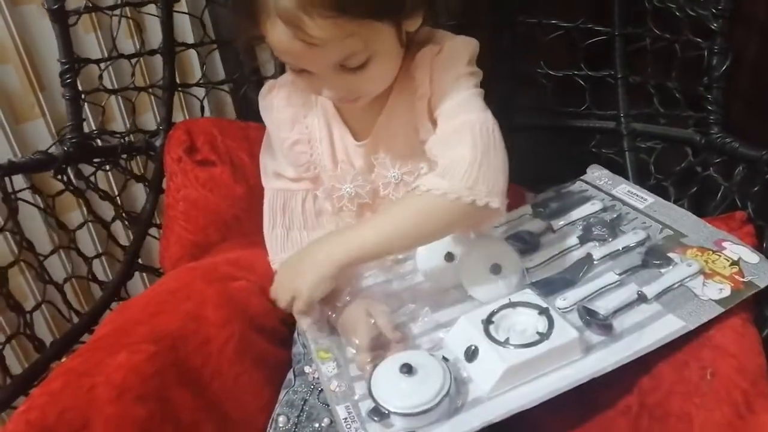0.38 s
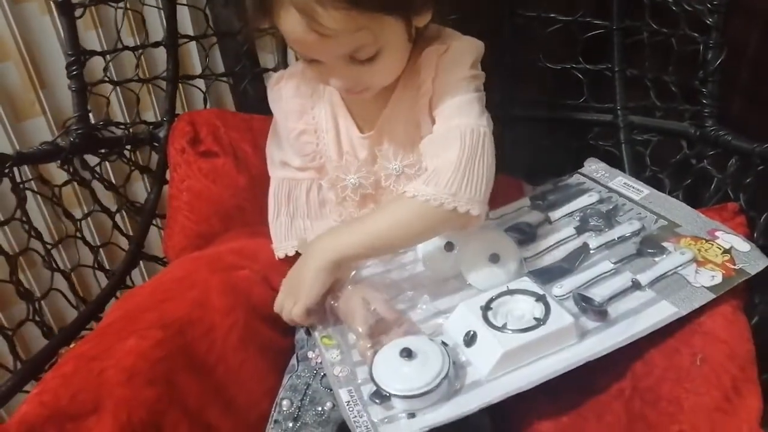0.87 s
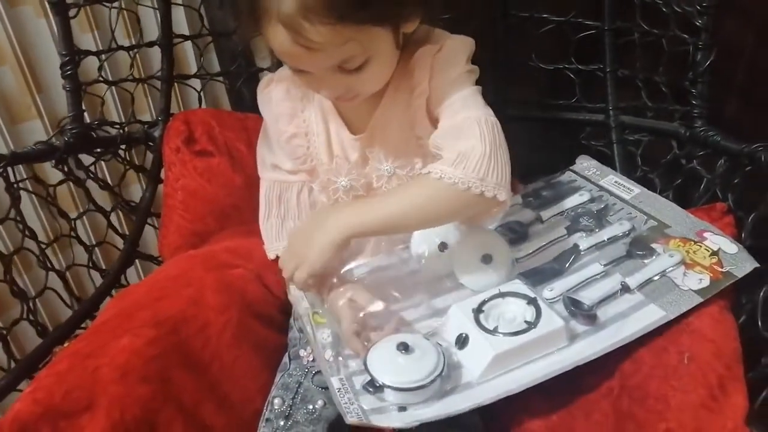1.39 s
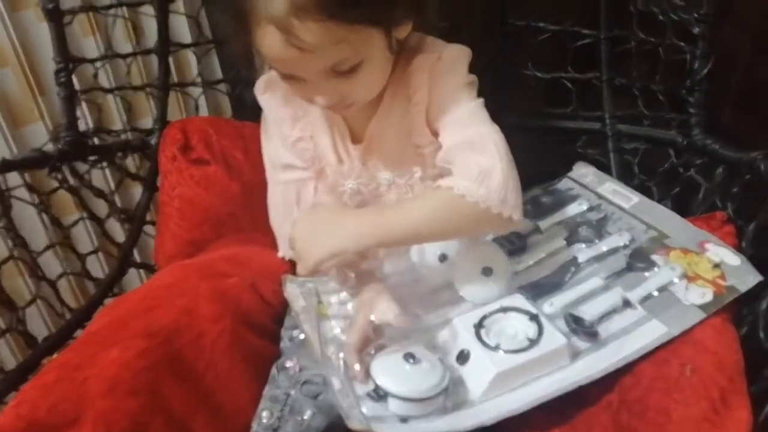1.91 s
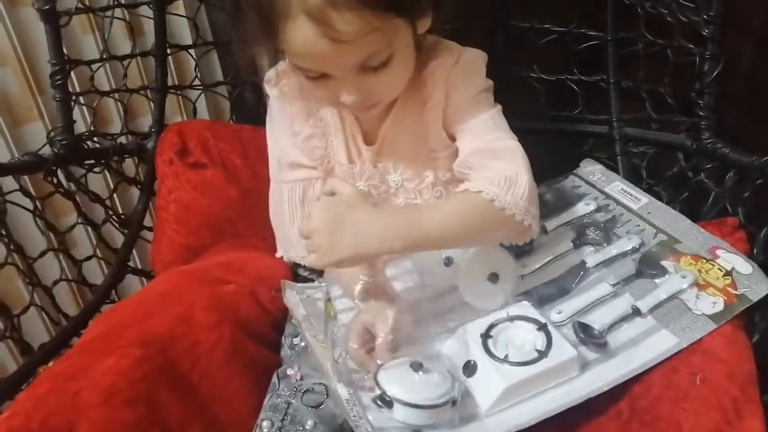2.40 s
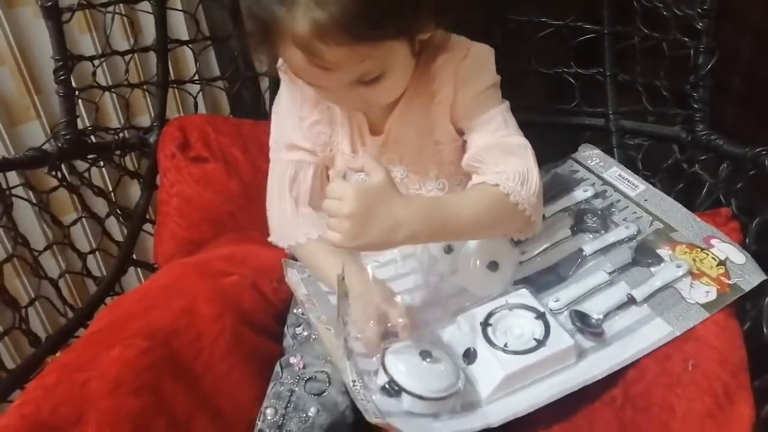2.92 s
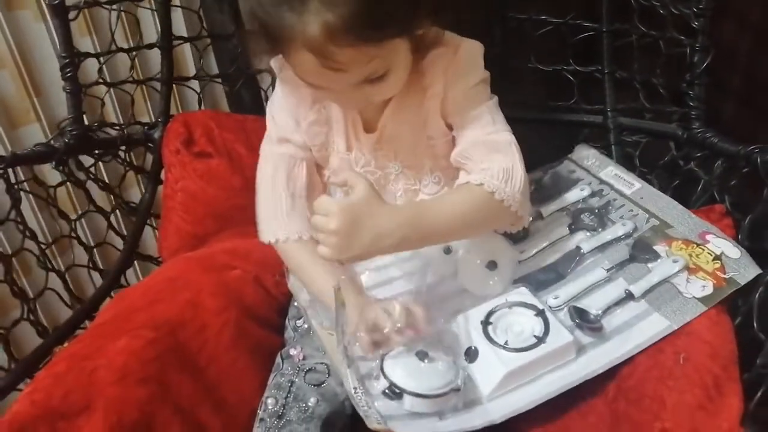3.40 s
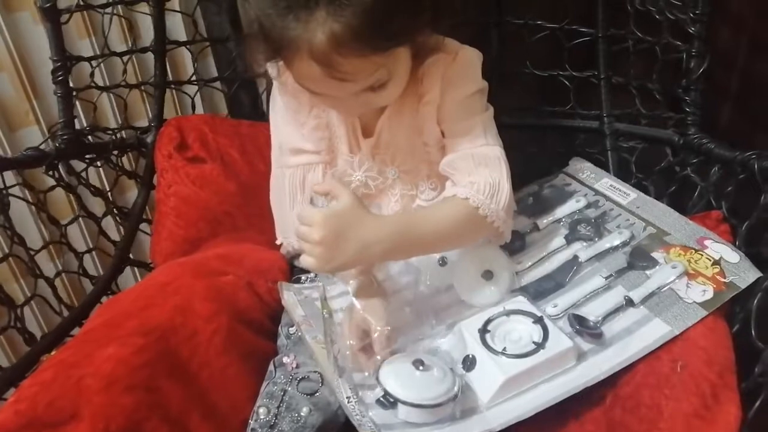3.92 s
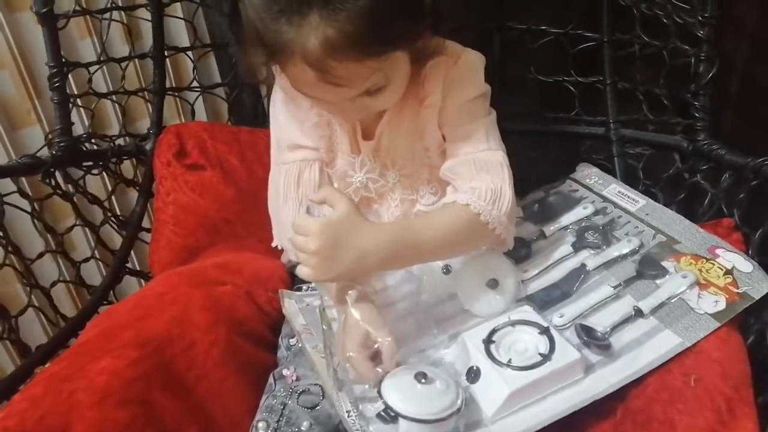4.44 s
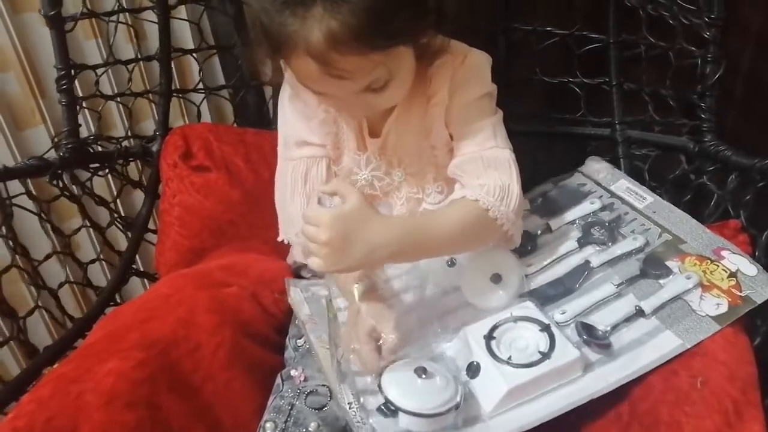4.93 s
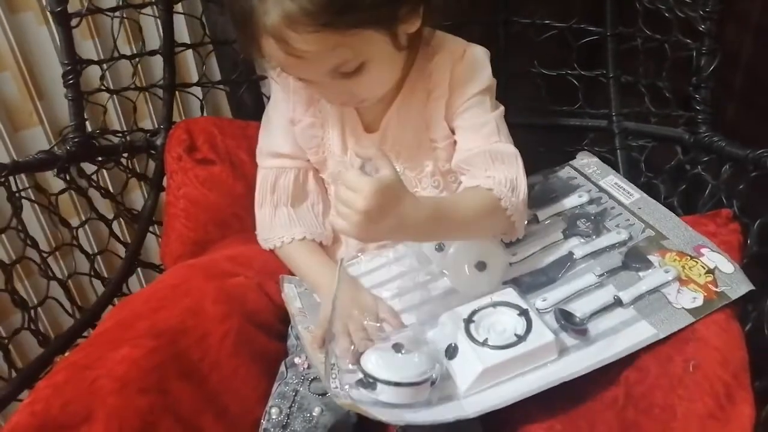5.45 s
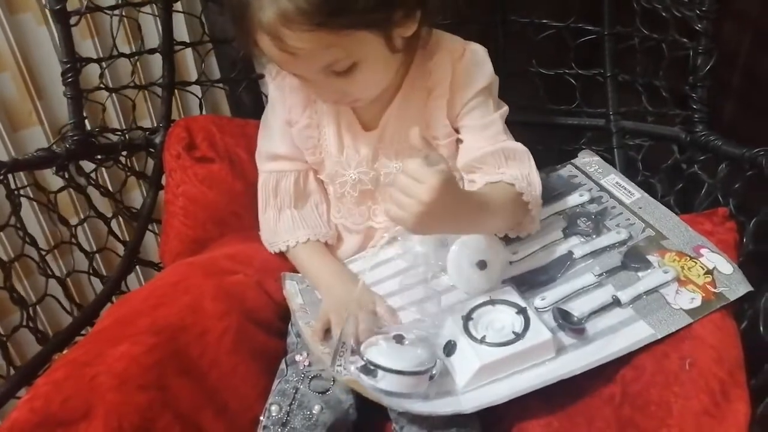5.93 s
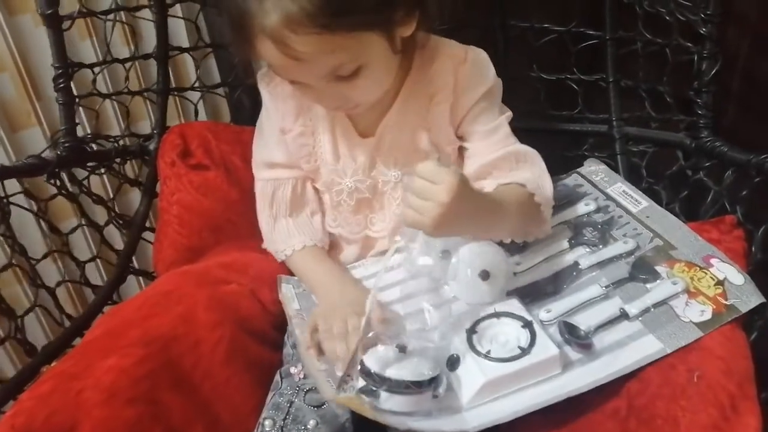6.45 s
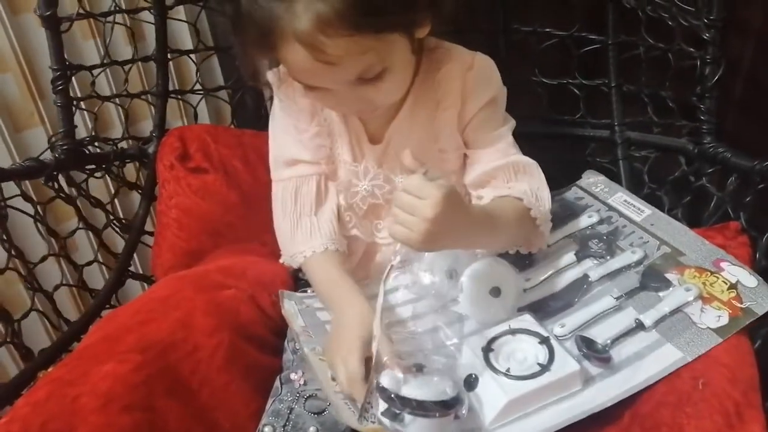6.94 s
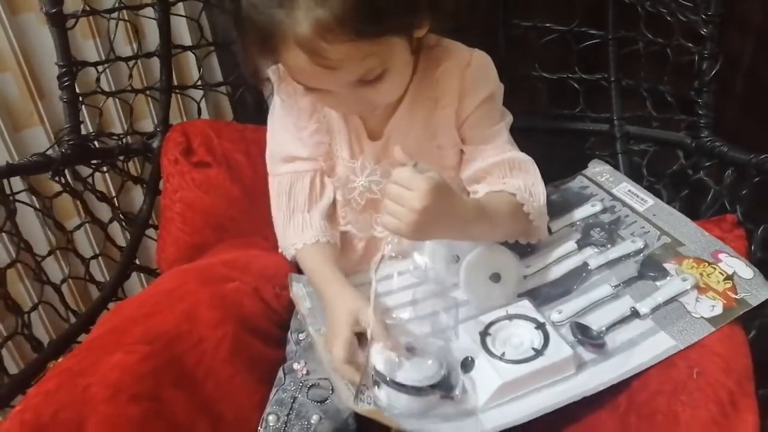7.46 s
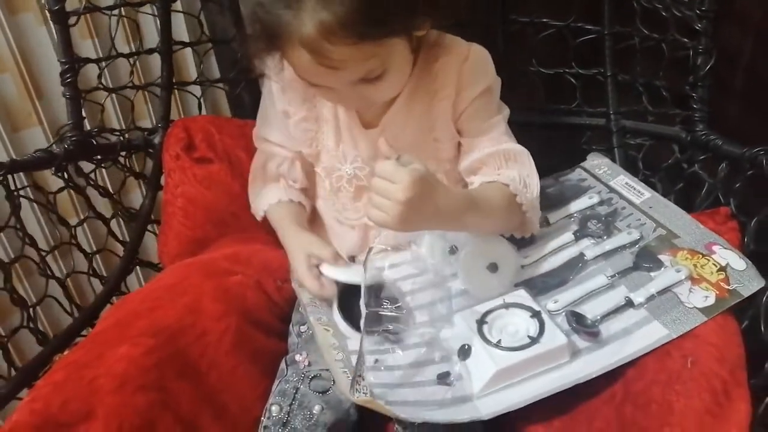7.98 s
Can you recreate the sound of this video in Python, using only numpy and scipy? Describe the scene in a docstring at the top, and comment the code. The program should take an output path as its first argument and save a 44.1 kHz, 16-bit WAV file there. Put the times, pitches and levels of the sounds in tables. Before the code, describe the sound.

A child's hands bend a stiff plastic blister sheet on a card. Sharp irregular snaps and fine crackle come in dense bursts for three seconds, thin to a near lull past four, then return until about seven before lightening. Small toys knock and scuff dully on the card. A tiny squeak comes near the end. Close stereo microphone, small furnished room, faint hiss and low hum.

```python
"""Hands bend a stiff clear plastic blister sheet on its card and work toy pieces out of it.
Buckles snap thickly until about 3 s, thin out to a near lull at 4 to 4.8 s, snap again up to 7 s,
then lightly to 8 s, with a short squeak at 7.85 s. Each snap: noise crack, ringing pocket, push on the card.
Knocks and scuffs excite card modes; grains make fine crackle. A small furnished room answers by echoes
and noise tails. Sine hum and noise hiss run throughout; two microphone ports, gain control."""
import sys
import numpy as np
from scipy import signal
from scipy.io import wavfile
from scipy.ndimage import uniform_filter1d

SR = 44100
rng = np.random.default_rng(int(sys.argv[2]) if len(sys.argv) > 2 else 0)


def generate_wav(sig):
    """Save sig (samples, or channels by samples) to the path in sys.argv[1] as 16-bit PCM at SR."""
    pcm = np.round(np.clip(np.atleast_2d(sig).T, -1, 1) * 32767).astype(np.int16)
    wavfile.write(sys.argv[1], SR, pcm)


def convert_level_to_amplitude(level_db):
    """Map a level in decibels to its linear amplitude factor."""
    exponent = np.asarray(level_db, float) / 20
    return 10 ** exponent


N = 356769  # samples

# Levels of sources are before trims, room, ports and gain control.
# loud buckles: t/s, crack level/dB, top octave level/dB, pocket level/dB, pocket f/Hz
SNAPS = [(0.0129, -51, -68, -59, 980), (0.0924, -42.5, -56, -56.5, 2900), (0.2239, -50, -78, -60, 780),
         (0.2634, -66, -79, -57, 1640), (0.2868, -39, -55, -50.5, 754), (0.378, -40, -53, -51, 1530),
         (0.3884, -42, -51, -45, 945), (0.4139, -36.5, -55, -48, 2920), (0.4651, -24, -36.5, -36, 2730),
         (0.4838, -31, -43, -44, 1410), (0.4968, -26.5, -52, -33, 1520), (0.5352, -30.5, -47, -37, 696),
         (0.5666, -19.5, -41.5, -34, 2220), (0.6963, -41, -60, -61, 764), (0.7637, -37.5, -67, -43.5, 1530),
         (0.8097, -41.5, -65, -55.5, 1020), (0.8369, -42.5, -65, -46, 1600), (1.076, -57, -65, -52.5, 890),
         (1.1178, -39.5, -58, -68, 3340), (1.14, -46, -62, -50.5, 970), (1.1689, -32.5, -51, -40, 3190),
         (1.1822, -34, -66, -34, 1670), (1.2149, -32, -49, -43.5, 780), (1.262, -44, -65, -52, 2870),
         (1.2779, -46, -57, -43, 1630), (1.3095, -35, -53, -44, 2820), (1.3708, -29.5, -39, -43, 2700),
         (1.3872, -26.5, -63, -42, 710), (1.4156, -35, -61, -43, 1280), (1.4345, -20.5, -40, -29.5, 2140),
         (1.49, -29.5, -64, -37.5, 2680), (1.5669, -40, -51, -51, 910), (1.581, -27.5, -53, -32.5, 940),
         (1.6197, -31, -49.5, -45, 2870), (1.6763, -32, -56, -38, 3250), (1.6866, -20.5, -47, -37.5, 1530),
         (1.708, -31, -53, -40, 3580), (1.7174, -23, -44.5, -36.5, 3540), (1.729, -23, -60, -34, 1630),
         (1.7795, -44, -69, -42, 2100), (1.8235, -23.5, -53, -41, 3400), (1.8647, -31, -60, -35.5, 1510),
         (1.9043, -35, -48, -45, 1620), (1.9334, -22.5, -43.5, -29, 1680), (1.9463, -27, -53, -38.5, 1370),
         (2.0533, -30.5, -72, -37.5, 3380), (2.096, -38, -68, -44, 1370), (2.1127, -21.5, -43, -36, 3500),
         (2.135, -38, -65, -42, 2970), (2.154, -25, -48, -41, 2200), (2.2191, -19.5, -42, -31.5, 2940),
         (2.265, -24.5, -42.5, -36.5, 1530), (2.364, -33, -52, -41.5, 2810), (2.382, -32, -47, -44.5, 2830),
         (2.443, -30, -43, -43.5, 1410), (2.5127, -37.5, -57, -46, 1500), (2.5399, -22, -41, -35.5, 820),
         (2.5814, -23, -45.5, -34.5, 910), (2.705, -38, -61, -51, 1500), (2.7452, -29.5, -55, -40.5, 900),
         (2.7673, -24, -43, -43, 2920), (2.811, -27.5, -47, -43.5, 1150), (2.8692, -27, -45.5, -38.5, 2910),
         (2.9474, -34.5, -53.5, -48, 3040), (2.9846, -32.5, -63, -40.5, 1340),
         (3.0864, -53, -72, -51.5, 910), (3.194, -39.5, -69, -57.5, 764), (3.2237, -46, -67, -58.5, 870),
         (3.2624, -30.5, -52, -44, 3760), (3.3209, -38.5, -59.5, -40, 1290),
         (3.3319, -29.5, -55, -40, 1070), (3.4351, -45.5, -84, -45.5, 883), (3.5389, -54, -78, -45, 759),
         (3.5566, -44, -71, -43, 1490), (3.5683, -40.5, -63, -38.5, 860), (3.6881, -71, -84, -50.5, 880),
         (3.7923, -47.5, -61.5, -47, 880), (3.905, -52, -73, -52, 910), (3.947, -47, -62, -62, 1490),
         (3.959, -44, -60, -60, 850), (4.0528, -55.5, -73, -48.5, 940), (4.5711, -51.5, -59, -91, 825),
         (4.8189, -35, -66, -57.5, 3250), (4.9686, -57.5, -77, -53.5, 1040),
         (5.1231, -36.5, -68, -42.5, 3190), (5.1552, -54, -82, -48, 1250), (5.2362, -61, -72, -66, 1350),
         (5.4568, -40.5, -57, -34.5, 1550), (5.4889, -45, -62, -47, 870), (5.6382, -32.5, -53, -44, 3010),
         (5.699, -27, -45, -34.5, 760), (5.7627, -31.5, -48.5, -41.5, 3120), (5.785, -35, -66, -38, 890),
         (5.8686, -33, -57, -42.5, 2430), (5.9406, -33, -52, -51, 3140), (5.9642, -56, -68, -45, 1490),
         (6.0437, -32, -50.5, -40.5, 2200), (6.0655, -34, -49, -41, 1530), (6.0901, -35, -53, -42, 930),
         (6.135, -29.5, -52, -49, 3020), (6.1456, -22, -41, -34.5, 3570), (6.2131, -27.5, -42.5, -42, 1200),
         (6.2321, -31, -49, -49, 1250), (6.2508, -31, -60, -44, 850), (6.3134, -50, -71, -56, 920),
         (6.4203, -23, -42, -42, 1280), (6.5775, -33.5, -62, -45.5, 2960),
         (6.633, -41.5, -81.5, -45.5, 1440), (6.7391, -56, -88, -49, 1660), (6.763, -52.5, -84, -62, 2240),
         (6.8402, -20.5, -38, -37, 1090), (6.8977, -29, -52, -45, 1930), (6.9773, -41.5, -62, -43, 1560),
         (7.217, -49.5, -76, -53.5, 2890), (7.2454, -48, -67.5, -74, 3420), (7.297, -54, -75, -62, 940),
         (7.532, -30, -52, -53, 3640), (7.5587, -46, -60, -48, 990), (7.6123, -37.5, -56, -56, 2860),
         (7.671, -35, -58, -44, 3320), (7.6805, -40, -64, -53, 1190), (7.6946, -36, -60, -61, 3480),
         (7.7085, -36, -57, -54, 3470), (7.7198, -33, -51, -44.5, 970), (7.9534, -55, -73, -52, 1220),
         (8.0057, -41, -66, -50.5, 2690)]
# crack colour: f/Hz, level/dB
CRACK_COLOUR = [(1500, -22.5), (3000, -7.5), (4200, -0.5), (6500, 2), (8500, -2.5), (10000, -37.5),
                (16000, -51)]
# top octave of the crack: f/Hz, level/dB
TOP_COLOUR = [(5000, -33.5), (8000, -5), (9000, 1.5), (15000, -2), (17000, -12)]
# broad part of the pocket knock: f/Hz, level/dB
POCKET_COLOUR = [(300, -30), (700, 0.5), (1200, 3), (3000, -0.5), (4200, -5.5), (8000, -48)]
# modes of the card and the toys on it: f/Hz, relative level/dB, t60/s
CARD_MODES = [(190, -36, .05), (301.6, -4.5, 0.072), (355.4, 1.5, 0.071), (410, -9.5, 0.12),
              (468.4, -10, 0.07), (651.7, -4.5, 0.041), (758, -2.5, 0.033), (885, -1, 0.034),
              (889, -4.5, 0.0087)]
# toys and fingers knock the card: t/s, low modes level/dB, upper modes level/dB
KNOCKS = [(0.229, -48, -56), (0.283, -52.5, -56), (0.387, -68, -50), (0.465, -41.5, -43.5),
          (0.505, -37.5, -47), (0.533, -35.5, -47), (1.076, -55, -68), (1.168, -49, -50),
          (1.364, -49, -48.5), (1.386, -40, -46), (1.491, -42, -49), (1.557, -44, -60), (1.581, -38, -44),
          (1.656, -54, -39.5), (1.778, -46, -46), (1.932, -50, -43.5), (2.056, -50, -54),
          (2.22, -48.5, -65), (2.263, -41.5, -50), (2.538, -42, -45), (2.585, -38, -37.5),
          (2.703, -44, -51), (2.946, -48.5, -49), (2.98, -51, -44.5), (3.086, -45.5, -45.5),
          (3.321, -41, -44), (3.435, -56, -45), (3.533, -46, -51), (3.568, -43, -45), (3.594, -41, -48),
          (3.686, -57, -46), (3.792, -52, -48), (3.906, -55, -51), (3.958, -51, -63), (4.05, -42, -42),
          (4.412, -65, -60.5), (4.97, -47.5, -47), (5.157, -50, -53), (5.432, -42, -37.5),
          (5.487, -51, -41.5), (5.698, -68, -41.5), (5.781, -45.5, -42.5), (6.035, -62, -52),
          (6.09, -42, -36), (6.141, -50, -47), (6.419, -54.5, -59), (6.631, -58, -49.5), (6.977, -67, -49),
          (7.036, -48.5, -66), (7.065, -64, -58), (7.721, -44, -50)]
# slow activity of the hands: t/s, fine crackle level/dB, card scuffing level/dB
HANDLING = [(0.0, -64, -68.5), (0.63, -46.5, -59), (0.88, -72, -71), (1.13, -57, -71), (1.3, -49, -62.5),
            (1.6, -53, -64), (2.37, -58, -86), (2.77, -53, -63), (3.09, -69, -65.5), (3.49, -59, -64),
            (4.28, -82.5, -76.5), (4.57, -78.5, -86.5), (5.86, -61, -76.5), (6.13, -76, -58.5),
            (6.26, -60, -72), (7.44, -69, -70.5), (7.73, -49, -65.5), (8.09, -64.5, -62.5)]
# longer swells of crumpling: peak t/s, fine crackle level/dB, card scuffing level/dB, rise/s, fall/s
CRUMPLES = [(.39, -50, -67, 0.027, 0.025), (.53, -50.5, -51, 0.056, 0.033), (1.4, -53, -59, 0.038, .08),
            (1.6, -58, -65, .03, 0.098), (2.58, -39, -56, 0.016, 0.084), (3.598, -61, -54.5, 0.035, 0.06),
            (5.051, -61.5, -62.5, 0.055, 0.064), (5.2, -64, -72, 0.034, 0.1),
            (5.449, -38.5, -47, 0.071, 0.05), (6.14, -40, -58, 0.083, .08), (7.7, -66, -59, 0.035, 0.02),
            (7.88, -57, -76, 0.028, 0.11)]
# fine crackle colour: f/Hz, level/dB
CRACKLE_COLOUR = [(300, -41.5), (700, -14), (1500, -1), (3000, -5), (6000, -4.5), (9000, -4.5),
                  (15000, -23)]
# toy edge squeaks along the plastic: peak t/s, level/dB, rise/(dB/s), fall/(dB/s)
SQUEAKS = [(7.853, -57., 500., 650.)]
# two squeak tones: f/Hz before the glide, f/Hz after it
SQUEAK_TONES = [(1550., 2400), (2850., 3300.)]
# near walls: t/s, level/dB
ECHOES = [(0.0128, -19), (0.0232, -21)]
# room decay: f/Hz, t60/s
ROOM_T60 = [(200, 0.19), (600, 0.29), (1500, 0.31), (4000, 0.45), (9000, 0.39), (15000, 0.3)]
# room tail colour: f/Hz, relative level/dB
ROOM_COLOUR = [(200, 10.5), (700, 0), (2000, 2), (5000, -5), (9000, -1.5), (15000, 6)]
# diffuse sound: f/Hz, left-right likeness (0 to 1)
LIKENESS = [(60, 0.52), (300, 1), (700, 0.43), (1300, 0.34), (2500, 0.12), (15000, 0.01)]
# hum level: t/s, level/dB
HUM_LEVEL = [(0, -67), (.4, -57.5), (1.1, -61), (2., -63), (3.2, -63.5), (4.4, -70), (5.2, -62), (6.2, -71),
             (6.75, -60), (7.3, -66), (8.09, -68)]
# hiss colour: f/Hz, relative density/(dB per Hz)
HISS_COLOUR = [(25, -4), (60, -5), (100, -7), (300, -17), (600, -23), (1500, -31.5), (3000, -35),
               (6000, -41), (10000, -35), (16000, -31)]
# microphone port colour: f/Hz, left level/dB, right level/dB
PORTS = [(30, 0, -4.5), (760, 5.5, 2.5), (1500, 3.5, 4), (2200, 3, 4), (3180, 7, 8.5), (4080, -0.5, 3.5),
         (4530, 3.5, 4.5), (5210, 3, 11), (6660, 2.5, 11), (8700, 4, -4.5), (9600, -0.5, -4.5),
         (11600, -8, -6), (13900, -12, -13), (14600, -4, -1), (15400, -19, -43.5)]


def snaps(crack_db=-2.0, top_db=16.5, pocket_db=2.56, card_db=-17.5, broad=1.3):
    """Each buckle: a two-band crack, a briefly ringing pocket and a light push on the card."""
    s, crack, top, pocket, hz = np.transpose(SNAPS)[:, :, None]
    count, t = len(SNAPS), np.arange(1024) / SR
    t60_s = 0.0079 + 0.005 * rng.random((count, 1))
    sign = np.sign(rng.random(count) - 0.5)

    sound = convert_level_to_amplitude(crack + crack_db) * cracks(count, CRACK_COLOUR, t60_s)
    sound += convert_level_to_amplitude(top + top_db) * cracks(count, TOP_COLOUR, 0.6 * t60_s)
    ring = peaked(np.sin(2 * np.pi * hz * t) * convert_level_to_amplitude(-60 * t / 0.011) * np.minimum(t / 0.001, 1))
    knock = ring + broad * cracks(count, POCKET_COLOUR, 3.3 * t60_s)
    sound += convert_level_to_amplitude(pocket + pocket_db) * peaked(knock)

    out, push = np.zeros((2, N + 2048)), np.zeros(N + 2048)
    at = np.round(s * SR).astype(int)
    for side in (0, 1):
        np.add.at(out[side], at + np.arange(1024), sound[side])
    np.add.at(push, at[:, 0], convert_level_to_amplitude(pocket + card_db)[:, 0] * sign)
    return out[:, :N] + signal.oaconvolve(push, card_ring())[:N]


def cracks(count, colour, t60_s, shiver_db=-11.0, shiver_t60_s=0.042, same=0.49):
    """Bursts of quick slips, then the sheet shivers out; each port sees its own side of the sheet."""
    t = np.arange(1024) / SR
    fall = convert_level_to_amplitude(-60 * t / t60_s) + convert_level_to_amplitude(shiver_db - 60 * t / shiver_t60_s)
    fall = fall * np.minimum(t / 0.00044, 1)
    both, left, right = np.moveaxis(rng.standard_normal((count, 3, 1024)), 1, 0)
    slips = (np.sqrt(same) * both + np.sqrt(1 - same) * np.array([left, right])) * fall
    return peaked(signal.fftconvolve(slips, causal(colour)[None, None], axes=2)[:, :, :1024])


def card_ring(modes=CARD_MODES):
    """The card and the toys on it as dying modes; a free card radiates no deep bass."""
    t = np.arange(6000) / SR
    ring = sum(convert_level_to_amplitude(db - 60 * t / t60_s) * np.sin(2 * np.pi * hz * t) for hz, db, t60_s in modes)
    return peaked(signal.sosfilt(signal.butter(2, 200, "high", fs=SR, output="sos"), ring))


def knocks(low_db=-2.0, upper_db=1.0, touch_s=0.00082):
    """Each knock is a soft push on the card, with separate levels for low and upper modes."""
    s, low, upper = np.transpose(KNOCKS)
    at = np.round(s * SR).astype(int)
    sign = rng.choice([-1.0, 1.0], len(s))
    touch = np.hanning(int(touch_s * SR) + 3)
    out = np.zeros(N)
    for db, modes in ((low + low_db, CARD_MODES[:5]), (upper + upper_db, CARD_MODES[5:])):
        push = np.zeros(N)
        np.add.at(push, at, convert_level_to_amplitude(db) * sign)
        out += signal.oaconvolve(push, peaked(np.convolve(card_ring(modes), touch)))[:N]
    return out


def crackle(level_db=-10.0, per_s=500.0, spread_db=2.5):
    """Countless tiny buckles, in 16 shapes, while the fingers press and pull."""
    shapes = np.moveaxis(cracks(16, CRACKLE_COLOUR, 0.0037), 1, 0)
    clicks = grains(per_s, spread_db) * clumps(window_s=0.025, depth_db=6.5)
    pick = rng.integers(0, 16, N)
    fine = np.zeros((2, N))
    for k, shape in enumerate(shapes):
        fine += signal.oaconvolve((clicks * (pick == k))[None], shape, axes=1)[:, :N]
    return handling(order=1) * convert_level_to_amplitude(level_db) * evened(fine)


def scuffing(level_db=-8.0):
    """Toys and hands drag over the card: grains keep its modes rumbling."""
    rumble = signal.oaconvolve(grains(per_s=420.0, spread_db=3.4), card_ring())[:N]
    return handling(order=2) * convert_level_to_amplitude(level_db) * evened(rumble)


def handling(order):
    """Gain of the hands' activity: slow curve plus the crumple swells; order is the table column."""
    gain = convert_level_to_amplitude(curve(HANDLING, order))
    for row in CRUMPLES:
        t = np.arange(N) / SR - row[0]
        gain = gain + convert_level_to_amplitude(row[order]) * np.exp(-(t / np.where(t < 0, row[3], row[4])) ** 2)
    return gain


def grains(per_s, spread_db):
    """Sparse clicks of random sign, a few of them large."""
    size = convert_level_to_amplitude(spread_db * np.minimum(rng.exponential(1, N), 4)) * rng.choice([-1.0, 1.0], N)
    return size * (rng.random(N) < per_s / SR)


def clumps(window_s, depth_db):
    """Random clumping gain: twice-smoothed noise, in dB."""
    size = int(window_s * SR)
    slow = uniform_filter1d(uniform_filter1d(rng.standard_normal(N), size), size)
    return convert_level_to_amplitude(depth_db * evened(slow))


def squeak(upper_db=-4.0, glide_s=0.006, wobble_depth=0.03):
    """Stick-slip drives two unsteady tones that glide up just before the level peaks."""
    s, db, rise, fall = SQUEAKS[0]
    t = np.arange(N) / SR - s
    grip = 1 + 0.7 * evened(uniform_filter1d(rng.standard_normal((2, N)), 130))
    wobble = 1 + wobble_depth * evened(uniform_filter1d(rng.standard_normal(N), 90))
    glide = 0.5 + 0.5 * np.tanh((t + glide_s) / glide_s)
    low, high = (np.sin(2 * np.pi * np.cumsum((a + (b - a) * glide) * wobble) / SR)
                 for a, b in SQUEAK_TONES)
    envelope = convert_level_to_amplitude(db - np.where(t < 0, -rise * t, fall * t))
    return envelope * (grip[0] * low + convert_level_to_amplitude(upper_db) * grip[1] * high)


def room(x, tail_db=0.0, right_lag_samples=3, turn_hz=3.1):
    """Direct sound (left port first), side-swapped wall echoes, tails dying band by band.
    As the hands move about, the sound passes in turn through three different tails."""
    out = np.array([x[0], np.roll(x[1], right_lag_samples)])
    for s, db in ECHOES:
        out += convert_level_to_amplitude(db) * np.roll(x[::-1], round(s * SR), 1)

    def decay(hz, s):
        return convert_level_to_amplitude(read(ROOM_COLOUR, hz) - 60 * s / read(ROOM_T60, hz))

    turn = 2 * np.pi * turn_hz * np.arange(N) / SR
    for k in range(3):
        tail = diffuse(decay, frames=480, size=256)
        onset = np.minimum(np.arange(tail.shape[1]) / SR / 0.0098, 1)
        tail *= convert_level_to_amplitude(tail_db) * onset / np.linalg.norm(tail[0])
        share = np.sqrt(2 / 3) * np.cos(turn + 2 * np.pi * k / 3)
        out += signal.oaconvolve((share * x[k % 2])[None], tail, axes=1)[:, :N]
    return out


def hum(line_hz=48.0, octave_db=-19.5):
    """A distant motor: a low line of fixed pitch and its octave, level drifting."""
    turn = 2 * np.pi * line_hz * np.arange(N) / SR
    lines = np.sin(turn) + convert_level_to_amplitude(octave_db) * np.sin(2 * turn)
    return convert_level_to_amplitude(curve(HUM_LEVEL, 1)) * np.sqrt(2) * lines


def hiss(rms_db=-70):
    """Steady room air and microphone noise."""
    noise = diffuse(lambda hz, s: convert_level_to_amplitude(read(HISS_COLOUR, hz)), frames=N // 512 + 5, size=2048)
    return convert_level_to_amplitude(rms_db) * evened(noise[:, :N])


def diffuse(gain, frames, size):
    """Two-channel random short-time spectra, alike in the bass; gain(hz, s) shapes them."""
    hz, s = np.fft.rfftfreq(size, 1 / SR)[:, None], np.arange(frames) * size / 4 / SR
    a, b, c, d = rng.standard_normal((frames, size // 2 + 1, 4)).T
    same = np.clip(read(LIKENESS, hz), -1, 1)
    left = a + 1j * b
    right = same * left + np.sqrt(1 - same ** 2) * (c + 1j * d)
    z = np.array([left, right]) * gain(hz, s)
    return signal.istft(z, nperseg=size, noverlap=3 * size // 4)[1]


def evened(x):
    """Scales to unit rms."""
    return x / np.sqrt(np.mean(x ** 2) + 1e-20)


def peaked(x):
    """Scales each row to unit peak."""
    return x / (abs(x).max(-1, keepdims=True) + 1e-20)


def read(points, hz):
    """Interpolates a table over log frequency."""
    f, value = np.transpose(points)
    return np.interp(np.log(hz + 1), np.log(f + 1), value)


def curve(rows, order):
    """Interpolates one table column over time."""
    rows = np.array(rows)
    return np.interp(np.arange(N) / SR, rows[:, 0], rows[:, order])


def causal(points, size=2048):
    """Minimum-phase filter of a given colour: phase from the Hilbert transform of the log gain."""
    log_gain = np.log(convert_level_to_amplitude(read(points, abs(np.fft.fftfreq(size, 1 / SR)))))
    return np.fft.ifft(np.exp(np.conj(signal.hilbert(log_gain)))).real[:size // 2]


def ducked(x, from_db=-63, back_db_per_s=106.5, smooth_s=0.044, split_hz=115):
    """Two-band gain control: loud moments turn the bass down much, the rest a little."""
    bass_slope, rest_slope = 0.48, 0.054  # dB of gain lost per dB over the threshold
    size = int(smooth_s * SR)
    window = np.ones(size) / size
    power_db = 10 * np.log10(signal.oaconvolve((x ** 2).mean(0), window)[:N].clip(1e-12))
    back = np.arange(N) * back_db_per_s / SR
    held_db = np.maximum.accumulate(power_db + back) - back  # instant rise, linear dB release
    over_db = signal.oaconvolve(np.maximum(held_db - from_db, 0), window)[:N]
    bass = signal.sosfiltfilt(signal.butter(2, split_hz, fs=SR, output="sos"), x)
    return bass * convert_level_to_amplitude(-bass_slope * over_db) + (x - bass) * convert_level_to_amplitude(-rest_slope * over_db)


def scene():
    """Sheet, card and squeak in the room, over hiss and hum."""
    return room(snaps() + knocks() + crackle() + scuffing() + squeak()) + hiss() + hum()


def roll_off(x):
    """The treble ends steeply here."""
    return signal.sosfilt(signal.butter(12, 16640, fs=SR, output="sos"), x)


def record(dry, edge_hz=16500):
    """Colour of each port, gain control, band limit."""
    hz, *sides_db = np.transpose(PORTS)
    ports = np.array([causal(np.transpose([hz, db])) for db in sides_db])
    heard = ducked(signal.oaconvolve(dry, ports, axes=1)[:, :N])
    low_pass = signal.firwin(255, edge_hz, window=("kaiser", 9), fs=SR)
    mix = signal.oaconvolve(heard, low_pass[None], "same")
    return roll_off(mix)


dry = scene()
out = record(dry)
generate_wav(out)
```